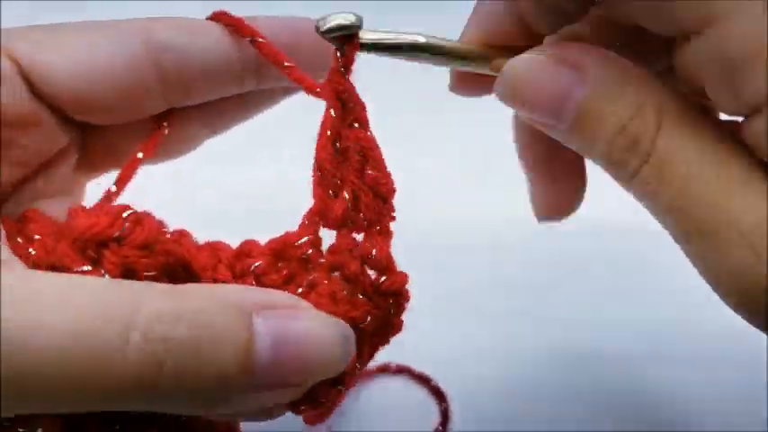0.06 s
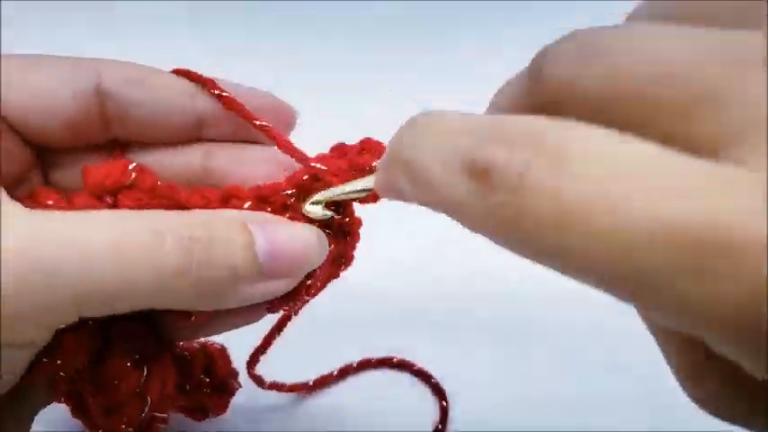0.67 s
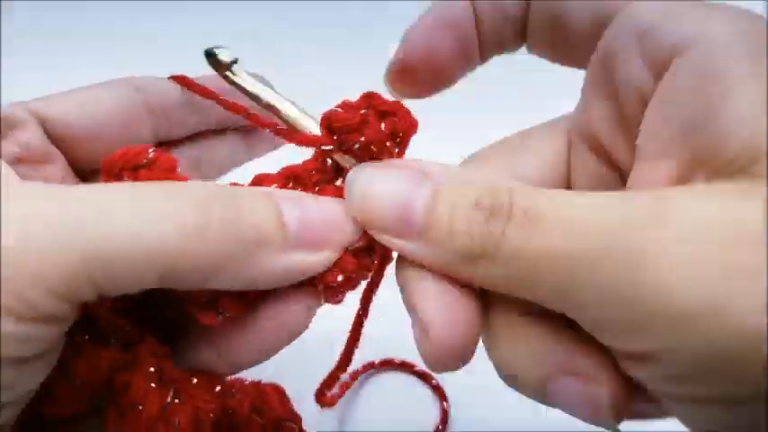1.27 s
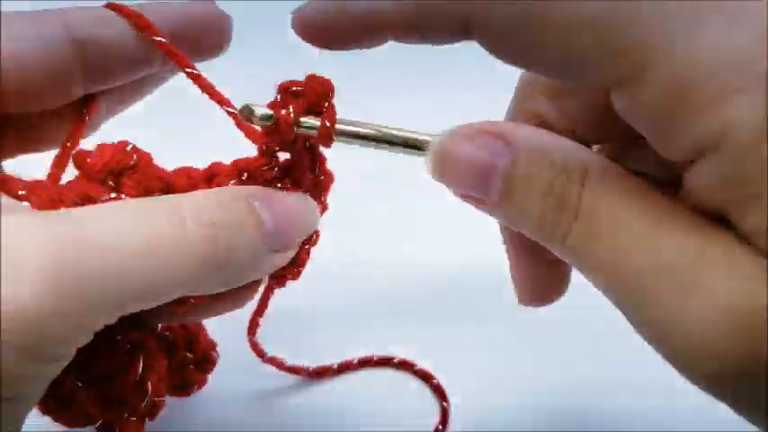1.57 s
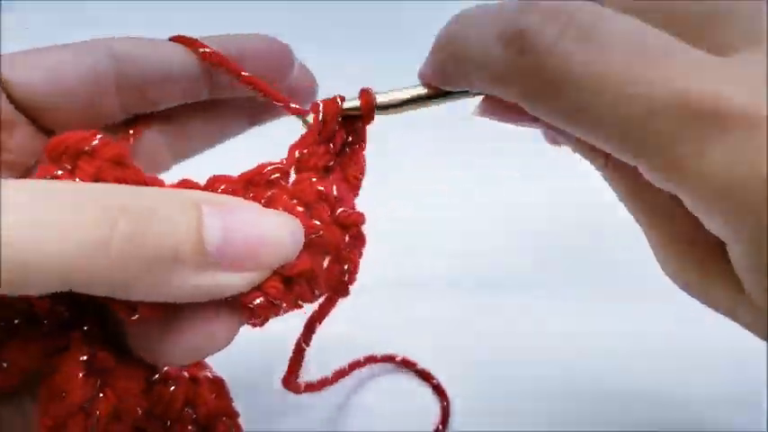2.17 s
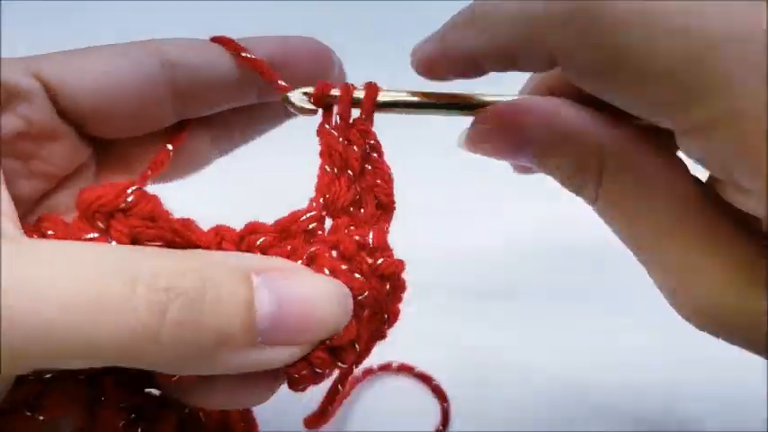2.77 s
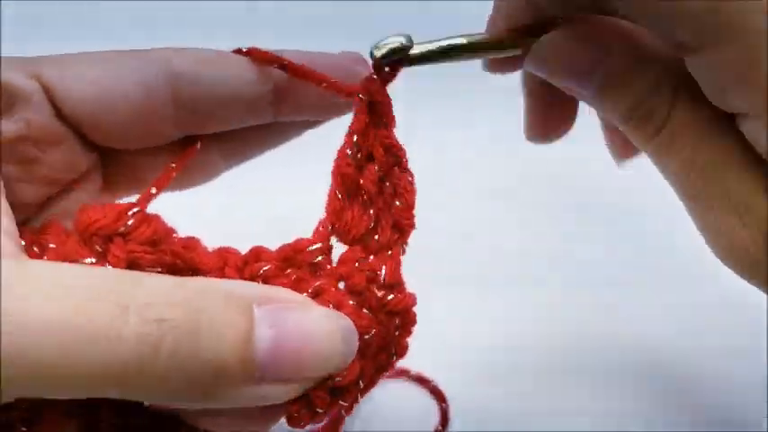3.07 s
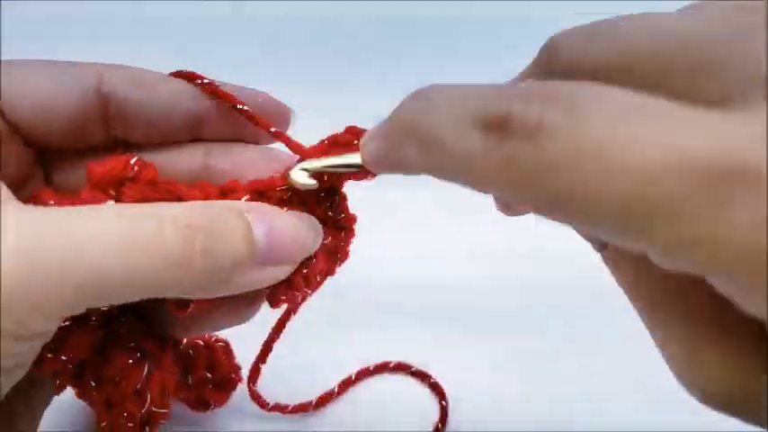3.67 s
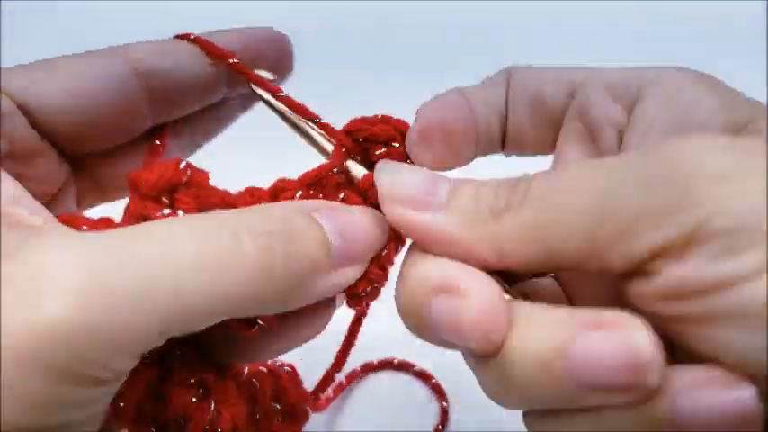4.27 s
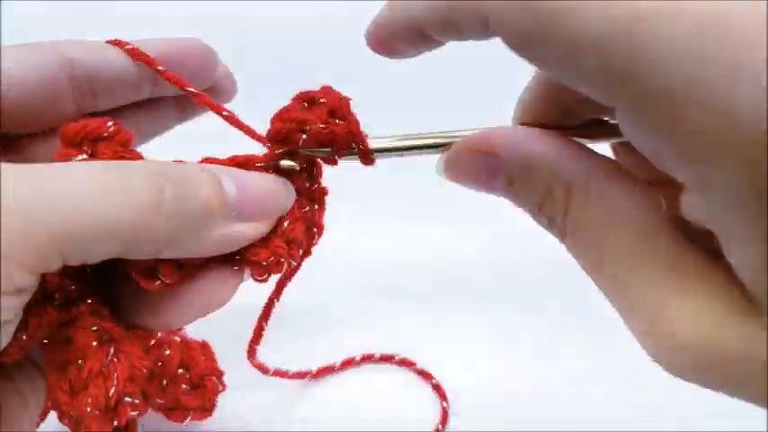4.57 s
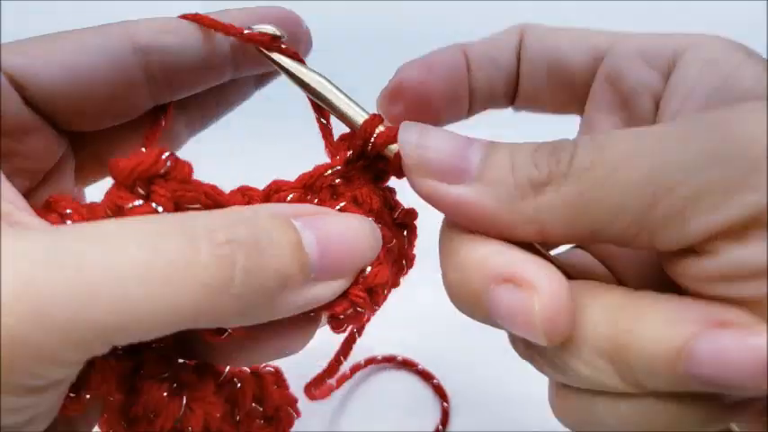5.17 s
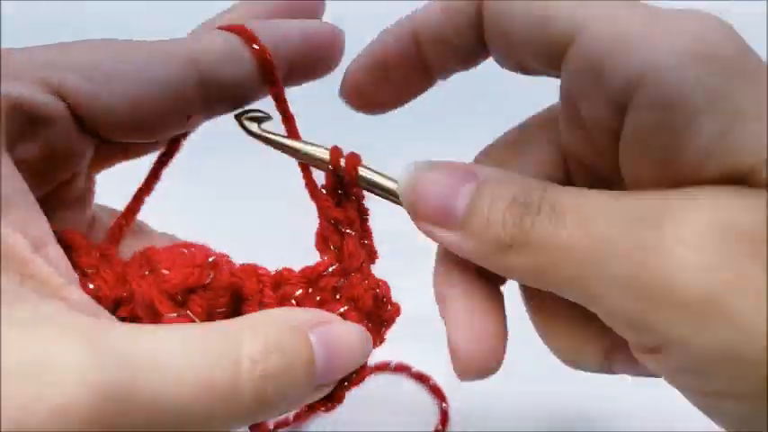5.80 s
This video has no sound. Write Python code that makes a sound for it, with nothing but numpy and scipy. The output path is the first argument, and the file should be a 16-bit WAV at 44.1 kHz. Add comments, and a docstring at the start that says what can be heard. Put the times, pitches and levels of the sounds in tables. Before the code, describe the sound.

Yarn slides over a metal crochet hook and fingers in short, irregular strokes, making a faint, high rustle close to the microphone on the left. Strands slip off the hook with tiny ticks, and tight loops now and then scratch and squeak thinly. Near the end comes one soft, deep bump, then two last strokes. The quiet room has a low rumble and a distant motor hum.

```python
"""Crochet by hand, close to the left microphone, in a quiet room with a low rumble and a distant motor hum.
From the start, yarn slides over a metal hook and the fingers: countless fibre slips make a soft high rustle.
Within the first second, strands begin to snap off the hook with tiny ticks; a little later, tight loops
chafe and squeak as the hook is drawn through. At 5.5 s comes a soft, deep bump, then two last strokes."""
import sys
import numpy as np
from scipy import signal
from scipy.fft import rfft, irfft
from scipy.io import wavfile
from scipy.ndimage import uniform_filter1d

SR = 44100
rng = np.random.default_rng(int(sys.argv[2]) if len(sys.argv) > 2 else 0)


def pcm_store(signal):
    """Save signal as 16-bit PCM."""
    levels = np.round(np.clip(np.atleast_2d(signal), -1, 1) * 32767)
    wavfile.write(sys.argv[1], SR, levels.astype(np.int16).T)


N = 257544
TIME = np.arange(N) / SR

# strokes of the hook through the yarn, close up:
# (middle [s], half length [s], rustle level [dB], rasp relative to it [dB], lightness of touch [0-1])
HOOK_STROKES = [ (0.405, 0.014, -71, -14, 0.8), (0.52, 0.052, -72.5, -14, 0.97), (0.595, .02, -76, -6, .8),
                (0.923, 0.013, -64, -8, 0.3), (0.956, 0.023, -67, -5, 0.4), (1.038, 0.015, -73, .5, .1),
                (1.073, 0.025, -69, -0.5, .25), (1.138, .027, -68, -6.5, .4), (1.211, 0.03, -63, -10, 0.72),
                (1.368, 0.057, -62, -8.5, 0.64), (1.408, 0.019, -68.5, 1, .3), (1.717, 0.038, -72, -2, 0.7),
                (1.917, 0.056, -71, -9, 0.85), (2.057, 0.038, -66.5, -3.5, 0.4),
                (2.23, 0.029, -68.5, -6.5, 0.55), (2.52, 0.075, -76, -9, 0.5),
                (2.655, 0.033, -68.5, -14, 0.85), (2.742, 0.036, -70, -2.5, 0.68),
                (2.969, 0.038, -72.5, -7, 0.5), (3.163, 0.01, -73.5, -9, .6),
                (3.474, 0.022, -69.5, -13, 0.9), (3.585, 0.053, -73.5, -8, .82), (3.675, .018, -73, -8, .9),
                (4.055, .04, -73.5, -2.5, 0.3), (4.11, 0.022, -71, 1.5, 0.3),
                (4.175, 0.025, -71.5, 2.5, 0.4), (4.258, 0.071, -70, -6.5, 0.5), (4.35, .025, -75, -5, .6),
                (4.484, 0.051, -64, -6, 0.67), (4.546, 0.02, -66, -3.5, .5), (4.714, .016, -67, -11, 0.7),
                (4.922, 0.037, -67.5, -2.5, 0.68), (5.095, .018, -68, -10, 0.96),
                (5.176, 0.026, -68.5, -8, 0.9), (5.279, 0.042, -66, -5, 0.35),
                (5.497, 0.026, -72.5, -5.5, .6), (5.736, 0.032, -70, -10.5, 0.6),
                (5.835, 0.02, -69.5, -9, .65)]
# yarn creeping between strokes, pausing while the hook is aimed: (time [s], level [dB])
YARN_CREEP = [(0, -78), (.3, -80), (.6, -79), (.68, -89), (.86, -85), (1.0, -78), (1.45, -76), (1.6, -79),
              (1.8, -83), (2.4, -77.5), (3.08, -81.5), (3.3, -80), (3.7, -78.5), (3.85, -91), (4.05, -81),
              (4.8, -85.5), (5.4, -79), (5.84, -82)]
# loose fibres brushing firmly: (frequency [Hz], relative level [dB])
BRUSH_SPECTRUM = [(1000, -22.5), (2900, -14.5), (4800, -14.5), (6500, -7), (8500, -3.5), (9600, -0.5),
                  (11500, -1.5), (13000, -7), (15700, -7)]
# loose fibres barely grazing: (frequency [Hz], relative level [dB])
GRAZE_SPECTRUM = [(3000, -19.5), (8800, -21), (11000, -7.5), (12500, -2), (13900, -1), (15700, -2.5)]
# single fibres snagging in the stitch: (frequency [Hz], relative level [dB])
CRACKLE_SPECTRUM = [(1300, -6), (2300, -1), (3600, -2.5), (4600, -7), (6000, -12)]
# taut yarn rasping over the hook: (frequency [Hz], width [Hz], relative level [dB])
RASP_RESONANCES = [(2750, 920, -16), (6720, 830, -10), (7490, 820, 2.5), (10700, 1800, -2.5)]
# tight loops binding on the hook:
# (middle [s], half length [s], level [dB], pitch [Hz], upper resonance [Hz], relative low ring [dB])
TIGHT_LOOPS = [(1.385, 0.038, -79, 5970, 12300, -18), (2.06, 0.037, -73, 6080, 10200, -18),
               (2.162, 0.01, -75, 6000, 9700, -11), (2.767, .034, -74.5, 6500, 10800, -10),
               (4.14, 0.042, -76, 6800, 13500, -16), (4.498, 0.042, -76, 5900, 13200, -20),
               (5.278, 0.041, -70, 6430, 11200, -12.5)]
# low ring of a binding loop: (frequency [Hz], width [Hz], relative level [dB])
LOOP_RESONANCES = [(1500, 1100, -0.5), (2980, 860, -0.5)]
# thin squeaks of yarn on metal: (middle [s], half length [s], frequency [Hz], width [Hz], level [dB])
HOOK_SQUEAKS = [(1.21, .04, 2800, 400, -87), (2.565, .023, 8500, 400, -76), (2.564, .03, 12500, 1000, -73),
                (2.768, .022, 3010, 80, -85), (2.98, .03, 13800, 1000, -74.5), (4.7, .005, 3800, 2600, -76),
                (5.5, .014, 13800, 700, -75.5)]
# dull rubs of yarn on skin: (time [s], level [dB])
SKIN_RUBS = [(0.435, -85), (0.92, -84), (1.296, -84), (1.34, -84), (2.005, -85), (2.965, -77.5),
             (4.103, -82)]
# strands slipping off the hook: (time [s], level [dB], time to fall 60 dB [s], lightness of touch [0-1])
STRAND_TICKS = [(0.774, -68, .036, .3), (0.833, -75, .04, 0), (0.917, -62.5, .05, 0),
                (1.3003, -56.5, .007, 0), (1.5097, -64, .006, .8), (2.152, -66.5, .025, 0),
                (2.22, -68, .04, 0), (2.648, -59, .006, .2), (4.1865, -56.5, .028, .8),
                (4.4003, -60, .005, .2), (4.691, -58.5, .007, .2), (4.697, -56, .036, .4)]
# tick of a firm touch: (frequency [Hz], relative level [dB])
TICK_SPECTRUM = [(1000, -30), (2900, -9), (5000, -5), (7500, 6), (10000, 5.5), (13500, 7.5), (15700, 4)]
# reflections off the table and hands: (delay [s], gain [ratio])
NEAR_REFLECTIONS = [(.0014, .22), (.0031, .15)]
# one soft bump: (time [s], frequency [Hz], peak level [dB], half length [s])
SOFT_BUMP = (5.546, 56, -32.5, .029)
# deep rumble in the room: (frequency [Hz], relative level [dB])
RUMBLE_SPECTRUM = [(22, -41), (30, -28), (39, -5), (47, -8.5), (56, 1.5), (64, -2.5), (74, 0), (88, -8.5),
                   (110, -2.5), (135, -16), (170, -33)]
# swells of the rumble: (middle [s], half length [s], rumble level [dB], boom level [dB])
RUMBLE_SWELLS = [(0.195, 0.025, -48, -52.5), (0.333, 0.014, -49, -49), (0.426, 0.023, -45.5, -52.5),
                 (0.684, 0.036, -47.5, -58), (0.91, 0.07, -49.5, -53), (1.316, 0.097, -48.5, -57),
                 (2.233, 0.03, -51, -58), (2.78, 0.051, -59, -49.5), (2.995, 0.025, -46, -52),
                 (3.276, 0.018, -47, -51.5), (3.426, 0.021, -45.5, -60), (3.8, 0.13, -52.5, -50),
                 (4.11, 0.026, -50.5, -53), (4.59, 0.061, -51, -54), (4.88, 0.058, -56, -56.5),
                 (5.243, 0.084, -59, -53), (5.51, 0.035, -43, -53), (5.701, 0.037, -50.5, -55.5)]
# steady room tone: (frequency [Hz], relative level [dB])
AIR_SPECTRUM = [(40, -13), (80, -1), (120, 4), (135, -6), (180, -7.5), (212, -10.5), (240, -7.5),
                (265, -13.5), (300, -10.5), (368, -18.5), (410, -28), (580, -36), (790, -34.5), (1200, -43),
                (3000, -55.5), (8000, -72)]
# distant motor and mains hum: (frequency [Hz], level [dB], waver [dB])
HUM_TONES = [(119.6, -57.8, 2), (147.5, -65.3, 1.5), (818.3, -101, 1.5), (974.4, -100.5, 1),
             (1207.6, -106, 1)]
# microphone self-noise: (frequency [Hz], relative level [dB])
HISS_SPECTRUM = [(300, -6), (900, -3.5), (1500, -2), (3500, -4), (5500, -7), (8500, -10), (10000, -6),
                 (11800, 0), (15700, 2)]
# room tone in opposite phase at the two microphones: (frequency [Hz], relative level [dB])
WIDE_AIR_SPECTRUM = [(50, -12.5), (120, -0.5), (320, -3), (420, -15), (800, -15.5), (1500, -21)]
# pickup of the yarn at the left, then the right microphone: (rustle gain [dB], rasp gain [dB])
MIC_PICKUP = [(-1, -4.5), (-11, -24.5)]


def yarn(creep_rasp_db=-9.5, creep_lightness=0.73, crackle_db=-84, firm_stroke_db=-67):
    """Close up, loose fibres brush the fingers and snag while taut yarn rasps over the hook."""
    strokes = [(undb(db) * swell(s, length, edge=1.34), undb(rasp_db), light)
               for s, length, db, rasp_db, light in HOOK_STROKES]
    creep = undb(np.interp(TIME, *np.transpose(YARN_CREEP)) + walk(12))
    strokes.append((creep, undb(creep_rasp_db), creep_lightness))
    firm = total(speed * np.sqrt(1 - light) for speed, _, light in strokes)
    grazing = total(speed * np.sqrt(light) for speed, _, light in strokes)
    taut = total(speed * tension for speed, tension, _ in strokes)
    uneven_pull = undb(.7 * walk(90) + .6 * walk(35))  # fast flutter and slower jerks
    # the contact shifts, so the resonances trade strength
    contact = [undb(db + 1.3 * walk(25)) for _, _, db in RASP_RESONANCES]
    pull = total([firm, taut]) / undb(firm_stroke_db)
    snagging = undb(crackle_db) * pull ** 0.46  # grows more slowly than the pull
    mics = []
    for rustle_db, rasp_db in MIC_PICKUP:
        brush = sum(level * colour(slips(per_second=8000, spread_db=1.5), spectrum)
                    for level, spectrum in [(firm, BRUSH_SPECTRUM), (grazing, GRAZE_SPECTRUM)])
        catches = slips(per_second=9100, spread_db=1.0)
        rasp = sum(gain * resonate(catches, hz, width)
                   for gain, (hz, width, _) in zip(contact, RASP_RESONANCES))
        crackle = snagging * colour(slips(per_second=600, spread_db=2.1), CRACKLE_SPECTRUM)
        mics.append(undb(rustle_db) * (brush + crackle) + undb(rasp_db) * taut * rasp)
    return uneven_pull * np.array(mics)


def chafes(pitch_sag=0.045):
    """Pressed fibres catch and slip: tight loops scratch, the metal squeaks, rubs on skin stay dull."""
    catches = slips(per_second=5500, spread_db=4.0)
    ring = sum(undb(db) * resonate(catches, hz, width) for hz, width, db in LOOP_RESONANCES)
    loops = 0
    for s, length, db, hz, upper_hz, ring_db in TIGHT_LOOPS:
        pitch = hz * (1 - pitch_sag * np.tanh((TIME - s) / length))  # sinks as the loop tightens
        scratch = glide(catches, pitch, width=900) + resonate(catches, upper_hz, width=1900)
        loops += undb(db) * swell(s, length) * (undb(ring_db) * ring + undb(-3.5) * scratch)
    squeaks = sum(undb(db) * swell(s, length) * resonate(catches, hz, width)
                  for s, length, hz, width, db in HOOK_SQUEAKS)
    rubbing = total(undb(db) * swell(s, length=0.021) for s, db in SKIN_RUBS)
    rubs = rubbing * resonate(catches, hz=664, width=350)
    return near_left_mic(loops + squeaks + rubs)


def ticks():
    """A strand jumps off the hook: a sudden burst that dies away, airier when the touch is light."""
    firm, airy = stereo_noise(TICK_SPECTRUM), stereo_noise(GRAZE_SPECTRUM)
    out = 0
    for s, db, t60, light in STRAND_TICKS:
        burst = undb(db - 60 * np.maximum(TIME - s, 0) / t60) * (TIME >= s)
        out += burst * (np.sqrt(1 - light) * firm + np.sqrt(light) * airy)
    return near_left_mic(out)


def reflect(x, path_drift=.02):
    """Table and hands mirror the sound; the paths change as the hands move, so its colour ripples."""
    paths = [(TIME - delay * (1 + path_drift * walk(3)), gain) for delay, gain in NEAR_REFLECTIONS]
    echoes = np.array([sum(gain * np.interp(when, TIME, mic) for when, gain in paths) for mic in x])
    return x + echoes


def bump():
    """A soft, deep thud, a little left of centre, that swells and fades over a few cycles."""
    s, hz, db, length = SOFT_BUMP
    return pan(undb(db) * swell(s, length) * np.sin(2 * np.pi * hz * (TIME - s)), left_db=2.5)


def room(boom_hz=55.98, boom_ring_s=.05):
    """Room tone: steady air over a rumble whose swells each carry a longer, deep resonant boom."""
    rumble = noise(RUMBLE_SPECTRUM)
    rumble /= np.sqrt(uniform_filter1d(rumble ** 2, size=6000))  # an even flow, before it swells
    between_swells = undb(-56 + 2 * walk(14))
    rumble *= total([between_swells] + [undb(db) * swell(s, length) for s, length, db, _ in RUMBLE_SWELLS])
    throb = total(undb(db) * swell(s, np.hypot(length, boom_ring_s)) for s, length, _, db in RUMBLE_SWELLS)
    boom = throb * np.sqrt(2) * np.sin(2 * np.pi * boom_hz * TIME + .8 * walk(4.1))
    air = undb(-59.5) * noise(AIR_SPECTRUM)
    wide_air = undb(-76.5) * noise(WIDE_AIR_SPECTRUM)
    return pan(rumble + boom + air, left_db=3.5) + np.array([wide_air, -wide_air])


def hum():
    """Tones of a distant motor, wavering a little in level and pitch."""
    tones = sum(undb(db + waver_db * walk(14)) * np.sin(2 * np.pi * hz * TIME + 0.6 * walk(6))
                for hz, db, waver_db in HUM_TONES)
    return pan(np.sqrt(2) * tones, left_db=3.5)


def hiss():
    """Each microphone's own faint hiss."""
    return undb(-76.5) * stereo_noise(HISS_SPECTRUM)


def slips(per_second, spread_db):
    """Fibres catching and letting go: dense clicks, a few stronger than the rest."""
    happens = rng.random(N) < per_second / SR
    size = undb(spread_db * np.minimum(rng.exponential(size=N), 5))
    return unit(happens * size * rng.choice([-1, 1], N))


def swell(s, length, edge=2):
    """A rise and fall around time s; edge 2 is a round bell, 1 a peak with long skirts."""
    near = slice(*np.searchsorted(TIME, [s - 10 * length, s + 10 * length]))
    level = np.zeros(N)
    level[near] = np.exp(-np.abs((TIME[near] - s) / length) ** edge / 2)
    return level


def walk(rate):
    """Smooth random wander, rate steps a second; rms 1."""
    hold = int(SR / rate)
    steps = np.repeat(rng.standard_normal(N // hold + 1), hold)[:N]
    return unit(uniform_filter1d(uniform_filter1d(steps, hold), hold))


def resonate(x, hz, width):
    """A steep resonance: one band-pass applied twice; rms 1."""
    b, a = signal.iirpeak(hz, hz / (1.74 * width), fs=SR)
    return unit(signal.lfilter(b, a, signal.lfilter(b, a, x)))


def glide(x, hz, width):
    """A resonance whose centre moves along the curve hz; rms 1."""
    turn = np.exp(2j * np.pi * np.cumsum(hz) / SR)
    b, a = signal.butter(2, width / SR)
    return unit(np.real(turn * signal.lfilter(b, a, x / turn)))


def colour(x, spectrum):
    """Filter by (frequency [Hz], level [dB]) points, falling 24 dB an octave beyond them; rms 1."""
    hz, db = np.transpose(spectrum)
    f = np.maximum(np.fft.rfftfreq(N, 1 / SR), 1)
    octaves_outside = np.maximum(np.log2(hz[0] / f), 0) + np.maximum(np.log2(f / hz[-1]), 0)
    gain = undb(np.interp(np.log(f), np.log(hz), db) - 24 * octaves_outside)
    return unit(irfft(rfft(x) * gain, N))


def noise(spectrum):
    """Steady coloured noise; rms 1."""
    return colour(rng.standard_normal(N), spectrum)


def stereo_noise(spectrum):
    """Separate noise at each microphone."""
    return np.array([noise(spectrum), noise(spectrum)])


def pan(x, left_db):
    """Place a sound between the microphones by its level difference."""
    return x * undb(np.array([[left_db], [-left_db]]) / 2)


def near_left_mic(x):
    """Full level on the left, 15 dB down on the right."""
    return x * undb([[0], [-15]])


def total(levels):
    """Joint level of unrelated sounds: their powers add."""
    return np.sqrt(sum(level ** 2 for level in levels))


def undb(db):
    """Decibels to gain."""
    return 10 ** (np.asarray(db) / 20)


def unit(x):
    """Scale to rms 1."""
    return x / np.sqrt(np.mean(x ** 2))


def scene():
    """Handwork close to the microphones, the quiet room behind it."""
    handwork = undb(0.08) * reflect(yarn() + chafes() + ticks())
    return handwork + bump() + room() + hum() + hiss()


def record(dry):
    """The sound fades in over 8 ms, and the highest treble is cut steeply."""
    fade_in = np.sin(np.pi / 2 * np.minimum(TIME / .008, 1)) ** 2
    low_pass = signal.ellip(12, .1, 80, 15720, fs=SR, output="sos")
    return signal.sosfilt(low_pass, fade_in * dry)


dry = scene()
out = record(dry)
pcm_store(out)
```